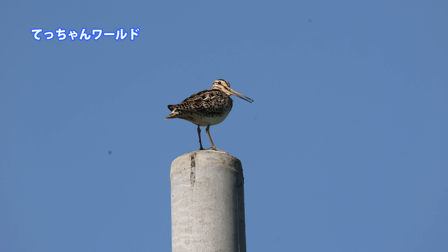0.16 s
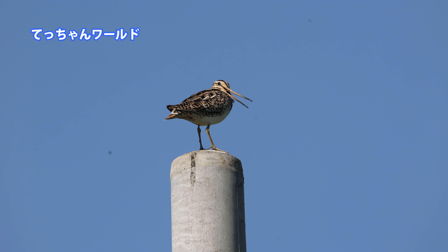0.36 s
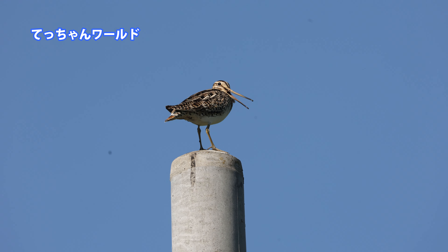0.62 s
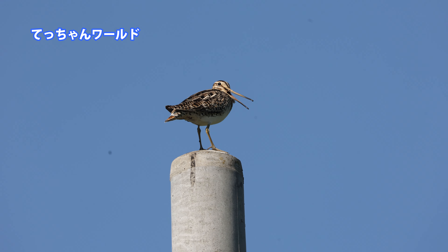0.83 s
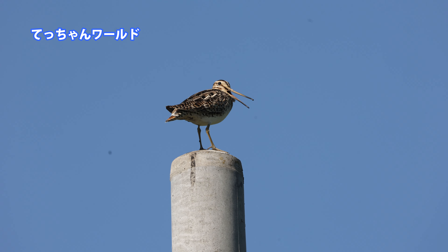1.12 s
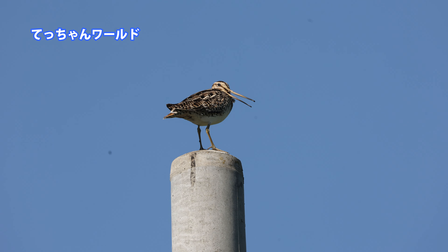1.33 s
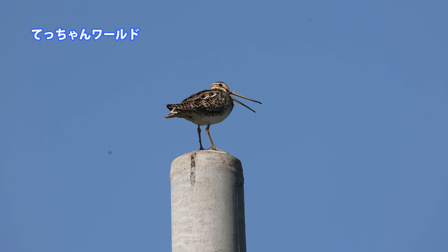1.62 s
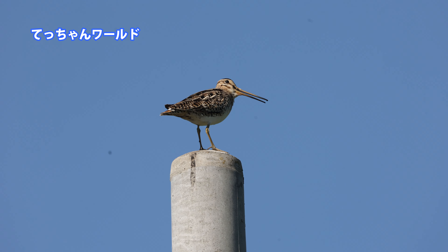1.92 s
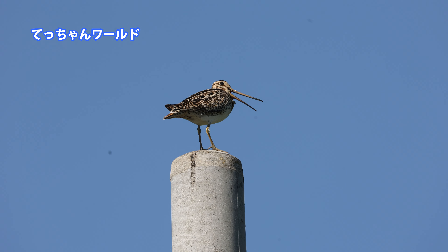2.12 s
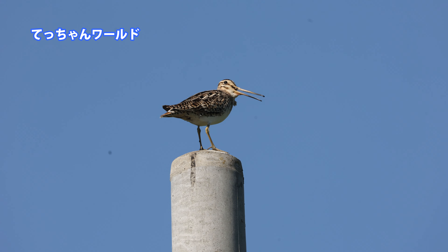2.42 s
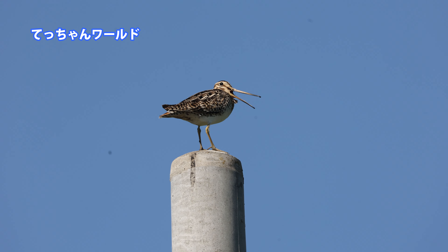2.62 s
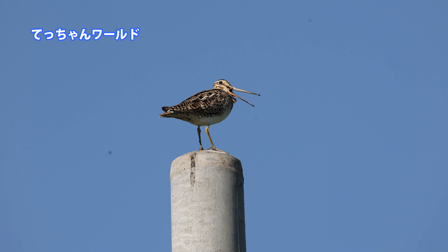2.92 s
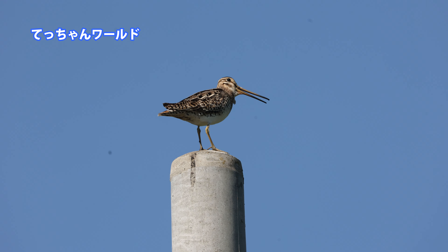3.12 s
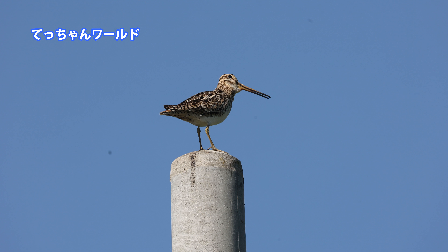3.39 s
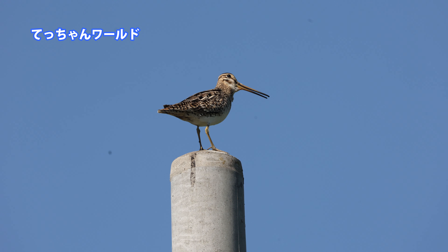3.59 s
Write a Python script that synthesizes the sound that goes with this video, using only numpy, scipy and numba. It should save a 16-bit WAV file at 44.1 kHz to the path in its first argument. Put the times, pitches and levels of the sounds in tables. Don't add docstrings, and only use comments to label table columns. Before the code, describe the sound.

Harsh buzzy rasping calls from a snipe, split by dry clicks, with low wind buffets

```python
import sys
import numpy as np
from scipy import signal
from scipy.fft import rfft, irfft
from scipy.io import wavfile
from scipy.ndimage import uniform_filter1d
from numba import njit

SR = 44100
rng = np.random.default_rng(int(sys.argv[2]) if len(sys.argv) > 2 else 0)


def boost(x):
    u = np.asarray(x, float) / 20
    return 10 ** u


def to_wav(s):
    ch = np.atleast_2d(s).T
    pcm = np.round(np.clip(ch, -1, 1) * 32767)
    wavfile.write(sys.argv[1], SR, pcm.astype(np.int16))


N = 165375


def rms_one(x):
    return x / np.sqrt(np.mean(x ** 2) + 1e-20)


def band(x, low_hz, high_hz, order=2):
    sos = signal.butter(order, [low_hz, high_hz], "band", fs=SR, output="sos")
    return signal.sosfilt(sos, x)


@njit
def resonate(x, hz, width_hz, sr):
    y = np.zeros(len(x))
    for i in range(2, len(x)):
        r = np.exp(-np.pi * width_hz[i] / sr)
        drive = (1 - r * r) / 2 * (x[i] - x[i - 2])
        y[i] = drive + 2 * r * np.cos(2 * np.pi * hz[i] / sr) * y[i - 1] - r * r * y[i - 2]
    return y


def throat(x, hz, widen, shoulder, shoulder_db, gap, second_db, air_db, fill_db=-60):
    def twice(centre_hz, width_hz):
        once = resonate(x, centre_hz, width_hz, SR)
        return resonate(once, centre_hz, width_hz, SR)

    flat = np.ones(len(x))
    opening_hz = hz - 2000
    width_hz = np.maximum(widen * (430 + 0.77 * opening_hz * abs(opening_hz) / 2500), 100)
    second_hz = 5190 + 1.68 * opening_hz
    second_width_hz = 1340 * second_hz / 5190
    second_level_db = second_db - 5 * (hz - 3000) / 1000
    pipe_db = -23 + 14.5 * np.clip((2400 - hz) / 450, 0, 1)
    top_air_db = -12.5 + second_db + air_db + (hz - 3500) / 1000

    y = twice(hz, width_hz)
    y = y - boost(shoulder_db) * twice(shoulder * hz, width_hz)
    y = y + boost(second_level_db) * twice(second_hz, second_width_hz)
    y = y - boost(pipe_db) * twice(1434 * flat, 300 * flat)
    y = y + boost(-12.5) * twice(0.74 * hz, 0.8 * hz)
    y = y - boost(top_air_db) * band(x, 7850, 14600)
    y = y + boost(-30) * band(x, 650, 1380)
    depth = np.clip(opening_hz / 2100, 0, 1)
    for spread in (0.95, 0.995, 1.05):
        y = y - depth * resonate(y, spread * gap * hz, 0.14 * hz, SR)
    return y + boost(fill_db) * twice(6200 * flat, 1100 * flat)


# t/s, level/dB, throat f/Hz
RASPS_EARLY = [
    [(0.0, -40, 3480), (0.204, -34, 3540), (0.212, -29, 3780), (0.224, -38, 3500), (0.248, -32, 3420),
     (0.264, -40, 3540), (0.275, -51, 3730)],
    [(0.521, -42, 3600), (0.539, -39, 3620), (0.565, -54, 3500), (0.675, -37, 4000), (0.773, -33.5, 3940),
     (1.239, -31, 4010), (1.319, -27.5, 3720), (1.335, -46, 3800)],
    [(1.548, -41, 4930), (1.564, -32.5, 4400), (1.594, -44.5, 4560), (1.892, -33.5, 4280),
     (1.948, -31, 3840), (2.012, -27.5, 2710), (2.066, -33, 2320), (2.072, -47, 2540)],
]
# t/s, level/dB, throat f/Hz
RASPS_LATE = [
    [(2.306, -29.5, 4600), (2.328, -29.5, 4440), (2.346, -31.5, 4400), (2.51, -32.5, 4430),
     (2.556, -27.5, 4000), (2.604, -26, 2470), (2.638, -27, 2360), (2.655, -43.5, 2360)],
    [(2.753, -34.5, 4580), (2.765, -25.5, 4180), (2.813, -28.5, 4508), (2.851, -24.5, 3470),
     (2.872, -32.5, 2640), (2.894, -39.5, 2170), (2.915, -40.5, 2070), (2.935, -38, 1990),
     (2.955, -37, 2070)],
    [(2.948, -39.5, 2260), (2.974, -31, 2350), (2.994, -27.5, 2900), (3.054, -30, 4070), (3.092, -31, 4150),
     (3.154, -27.5, 3410), (3.184, -24.5, 2280), (3.22, -32.5, 2090), (3.228, -47.5, 2220)],
    [(3.411, -29, 3640), (3.427, -25, 2830), (3.445, -28.5, 2250), (3.468, -35.5, 1945), (3.56, -37, 1820),
     (3.6, -34, 1990), (3.632, -29.5, 2240), (3.671, -30, 2180), (3.692, -46, 2170)],
]
# width factor, shoulder f ratio, shoulder level/dB, gap f ratio, second level/dB
RASP_COLOURS = [(0.59, 1.497, -8, 2.19, -55), (1.2, 1.452, -10, 1.86, -35), (0.75, 1.147, -8.5, 1.57, -16),
                (0.79, 1.094, 1, 1.423, -15.5), (.95, 1.095, 2, 1.37, -13.5), (1.06, 1.127, 0, 1.52, -16.5),
                (1.06, 1.144, -3.5, 1.57, -16.5)]
RASP_AIRS_DB = [0, -12, -26, -4, -6, -5, -6.5]
RASP_FILLS_DB = [-24.5, -15.5, -40, -42, -48, -40, -28]
# t/s, boost/dB
SWELLS = [(1.566, 1.5), (1.954, 5.5), (2.034, 5.5), (2.328, 6.5), (2.612, 4), (3.609, 5.5), (2.854, 0.5),
          (3.013, 2), (3.149, 1.5), (3.215, 4)]


def rasps():
    out, t = np.zeros(N), np.arange(N) / SR
    all_rasps = RASPS_EARLY + RASPS_LATE
    s, db, _ = np.transpose(sorted(tuple(row) for rows in all_rasps for row in rows))
    effort_db = np.clip(np.interp(t, s, db) + 32, -18, 6)
    snap_count = np.cumsum(620 * boost(0.3 * effort_db)) / SR
    jitter, uneven = rng.standard_normal((2, 6000))
    at = np.searchsorted(snap_count, np.cumsum(np.exp(0.3 * jitter)))
    inside = at < N
    snaps = np.zeros(N)
    snaps[at[inside]] = boost(-2 * uneven[inside])
    gate = signal.lfilter([1], [1, -np.exp(-1 / (0.0074 * SR))], snaps)
    breath = gate * rng.standard_normal(N)
    source = 0.62 * rms_one(snaps) + 0.38 * rms_one(breath)

    swell_s = 0.0032
    swell_db = sum(boost_db * np.exp(-0.5 * ((t - s0) / swell_s) ** 2) for s0, boost_db in SWELLS)
    for rows, colour, air_db, fill_db in zip(all_rasps, RASP_COLOURS, RASP_AIRS_DB, RASP_FILLS_DB):
        s, db, hz = np.transpose(rows)
        span = slice(int(s[0] * SR), int(s[-1] * SR))
        level_db = np.interp(t[span], s, db)
        glide_hz = uniform_filter1d(np.interp(t[span], s, hz), size=450)
        effort_air_db = 0.43 * (level_db + 29.5) + air_db
        voice = throat(source[span], glide_hz, *colour, effort_air_db, fill_db)
        voice = voice / np.sqrt(uniform_filter1d(voice ** 2, size=1300) + 1e-12)
        fade = np.clip((s[-1] - t[span]) / 0.01, 0, 1)
        out[span] += voice * boost(level_db + swell_db[span] - 1.5) * fade
    return out


# t/s, peak level/dB, throat f/Hz
TICKS = [(.4578, -47, 3020), (0.4701, -21.5, 3400), (0.4729, -27, 3070), (0.4755, -38, 3250),
         (0.569, -59, 3900), (0.572, -56, 3900), (0.5808, -52, 3900), (.5898, -41, 3900),
         (.5955, -42, 3860), (.6000, -30, 3800), (1.4993, -19.5, 3920), (1.5008, -17, 3750),
         (1.5057, -23.5, 3800), (2.161, -44, 2840), (2.1662, -26.5, 3180), (2.1709, -20.5, 3320),
         (2.1736, -29, 3240), (2.687, -33.5, 2480), (2.691, -24, 2600), (2.6935, -19, 2820),
         (2.6957, -19, 3060), (3.2799, -35.5, 2130), (3.2814, -30.5, 2250), (3.284, -25, 2300),
         (3.2868, -23.5, 2270), (3.2893, -34, 2200), (0.2111, -21, 3950), (2.3283, -33, 4300),
         (2.6083, -21, 2540), (2.6120, -27, 2480), (2.9702, -14, 2360), (3.6100, -21, 2180)]


def ticks():
    out, length = np.zeros(N), 600
    ring_width_hz = np.full(length, 910.0)
    for s, db, hz in TICKS:
        snap = np.zeros(length)
        snap[2] = 1
        throat_hz = np.full(length, float(hz))
        shoulder_db = -32.5 + (hz - 3000) / 90
        crack = throat(snap, throat_hz, 1, 1.54, shoulder_db, 1.79, -19, air_db=-6.88)
        tick = resonate(crack, throat_hz, ring_width_hz, SR) + boost(7) * crack
        start = int(s * SR)
        out[start:start + length] += boost(db) * tick / abs(tick).max()
    return out


# delay/ms, gain
LEFT_ECHOES = [(2.585, -.14), (3.195, .39), (3.575, -.27), (3.775, .36), (3.955, .23), (4.3, -.19),
               (5.0, .16)]
# delay/ms, gain
RIGHT_ECHOES = [(.725, -.16), (1.32, .23), (1.555, .16), (2.16, .23), (3.195, .23), (3.86, .2),
                (4.16, -.16), (4.43, -.14)]


def surroundings(x):
    echo_cut_hz = 10000
    dull = signal.sosfilt(signal.butter(1, echo_cut_hz, fs=SR, output="sos"), x)
    lead = SR / (2 * np.pi * echo_cut_hz)
    n, t, out = np.arange(N), np.arange(SR // 2) / SR, []
    for echoes in (LEFT_ECHOES, RIGHT_ECHOES):
        near = sum(gain * np.interp(n - ms * SR / 1000 + lead, n, dull, left=0) for ms, gain in echoes)
        tail = np.zeros(len(t))
        for db, t60_s in ((-3.5, 0.028), (-19.5, 0.45)):
            noise = rng.standard_normal(len(t)) * (t > 0.004)
            tail += boost(db) * rms_one(noise * boost(-60 * t / t60_s))
        tail /= np.sqrt(len(t))
        out.append(x + boost(-2.5) * near + signal.fftconvolve(dull, tail)[:N])
    return np.array(out)


def drift(rate_hz):
    steps = rng.standard_normal(int(N / SR * 200) + 9)
    return np.interp(np.arange(N) / SR * rate_hz, np.arange(len(steps)), steps) * 1.22


# t/s, level/dB, left minus right/dB
GUST = [(0.0, -12, -41), (0.09, -23, -2), (0.12, -12, -7), (0.159, -32, 0.5), (0.21, -41.5, -17),
        (0.518, -38, -19), (0.538, -21, -28), (0.65, -31.5, -5), (0.68, -39, -5), (0.76, -42.5, -26),
        (0.859, -16, -42), (1.14, -50, -4), (1.23, -25, -36), (1.53, -74.5, -13), (2.3, -61.5, -5),
        (2.4, -34, -27), (2.78, -73, -7), (3.75, -95, 25)]
# t/s, peak level/dB, f/Hz, left minus right/dB
BUFFETS = [(0.05, -13, 337, -30), (0.06, -18.5, 235, 16), (0.106, -11, 149, 15), (.119, -3, 173, -22),
           (0.131, -14.5, 170, 17), (0.151, -12.5, 131, 9), (0.312, -26, 110, -17),
           (0.453, -27.5, 135, -23), (0.738, -25, 172, -25), (0.555, -5, 245, -27), (0.584, -14, 280, -29),
           (0.603, -6, 184, -30), (0.626, -16, 276, -27), (0.637, -11.5, 182, -34), (0.857, -8.5, 202, -24),
           (0.871, -11, 266, -29), (0.88, -11.5, 280, -28), (0.967, -20.5, 181, -25),
           (1.249, -18.5, 138, -18), (1.363, -25, 90, -21), (2.045, -34, 94, -16), (2.079, -36, 91, -18),
           (2.482, -31.5, 110, -20), (2.602, -41, 87.5, -18), (.39, -32.5, 130, -20),
           (1.069, -33.5, 110, -20), (2.015, -45, 110, -7), (2.116, -45, 110, -10), (2.15, -41, 85, -10),
           (2.346, -40.5, 101, -19), (2.555, -33.5, 129, -15)]


def wind():
    s, db, pan_db = np.transpose(GUST)
    out, t = np.zeros((2, N)), np.arange(N) / SR
    gust_db = np.interp(t, s, db)
    for side, sign in enumerate((1, -1)):
        port_db = np.interp(t, s, db + 2.5 + np.minimum(0, sign * pan_db))
        level_db = np.minimum(port_db + 6.5 * (drift(34.97) - 1), -25)
        slap_db = -65.5 + 6.8 * (np.minimum(level_db, gust_db - 2.5) + 29)
        rumble = rms_one(band(rng.standard_normal(N), 39, 53))
        boom = rms_one(band(rng.standard_normal(N), 110 * 0.69, 110 * 1.4))
        slap = rms_one(band(rng.standard_normal(N), 280 * 0.94, 280 * 1.58, order=4))
        out[side] = boost(level_db) * boom + boost(slap_db) * slap + boost(-22 + 0.64 * gust_db) * rumble
        for s0, peak_db, hz, lean_db in BUFFETS:
            turn = (t - s0) * hz
            swell = np.exp(-(abs(turn) / 0.5) ** 1.26)
            out[side] += boost(peak_db + min(0, sign * lean_db)) * swell * np.cos(2 * np.pi * turn - 0.6)
    return signal.sosfilt(signal.butter(2, 55, "high", fs=SR, output="sos"), out)


# f/Hz, level/dB
HUSH = [(18, -72), (30, -2), (231, 1), (683, 3), (908, 3.5), (1780, -3.5), (2360, -3.5), (2690, -5.5),
        (14400, -25)]


def hush():
    hz, db = np.transpose(HUSH)
    bins_hz = np.arange(N // 2 + 1) * SR / N
    shape = boost(np.interp(np.log(bins_hz + 1), np.log(hz), db))
    mid, side = (rms_one(irfft(rfft(noise) * shape, N)) for noise in rng.standard_normal((2, N)))
    alike = 0.26
    side_gain = np.sqrt((1 - alike) / (1 + alike))
    return boost(-59) * (mid + side_gain * side * np.array([[1], [-1]]))


def scene():
    return surroundings(rasps() + ticks()) + wind() + hush()


def low_pass(x):
    return signal.sosfilt(signal.butter(12, 15320, fs=SR, output="sos"), x)


def record(dry):
    dip_hz, dip_width_hz = np.full(N, 12050.0), np.full(N, 1360.0)
    ports = np.array([x - resonate(x, dip_hz, dip_width_hz, SR) for x in dry])
    mix = signal.sosfilt(signal.cheby2(10, 45, 14900, fs=SR, output="sos"), ports)
    return low_pass(mix)


dry = scene()
out = record(dry)
to_wav(out)
```